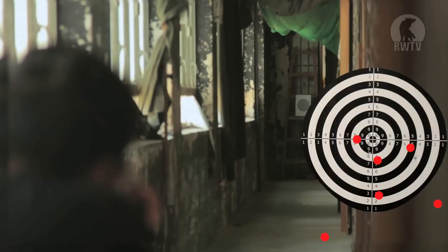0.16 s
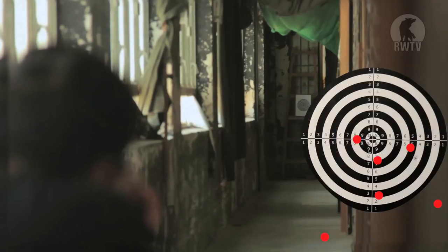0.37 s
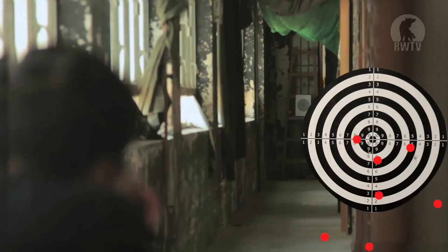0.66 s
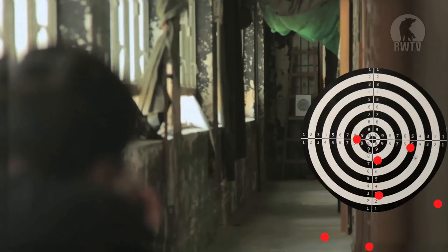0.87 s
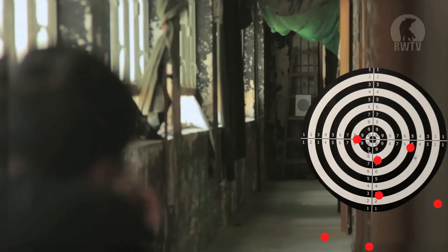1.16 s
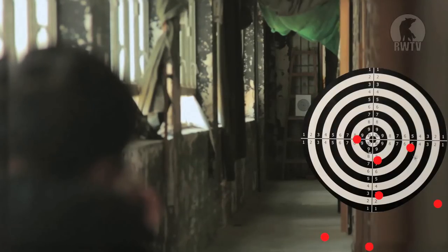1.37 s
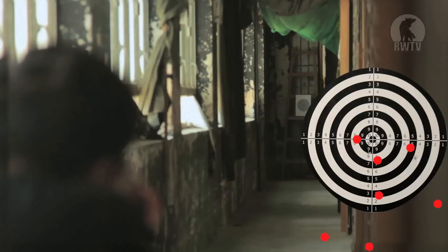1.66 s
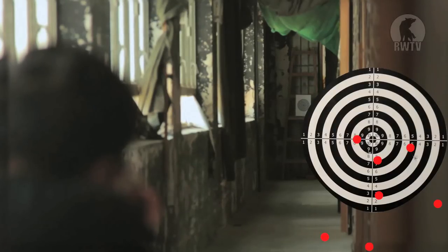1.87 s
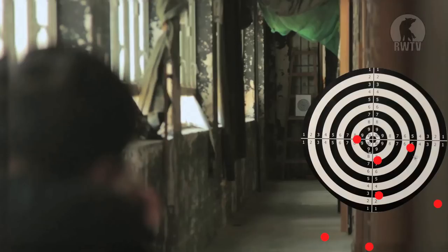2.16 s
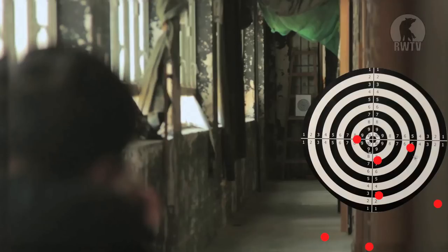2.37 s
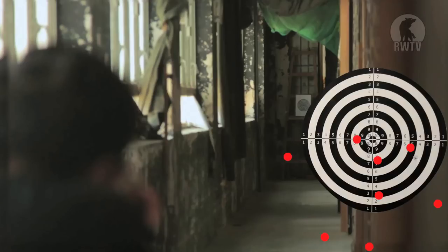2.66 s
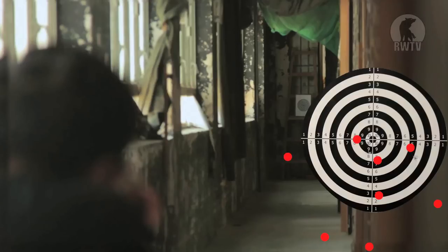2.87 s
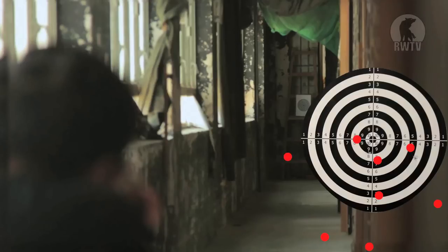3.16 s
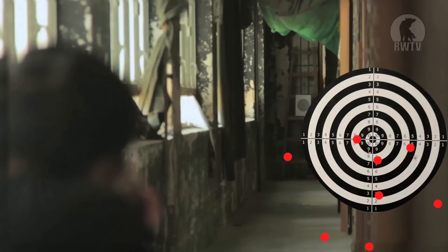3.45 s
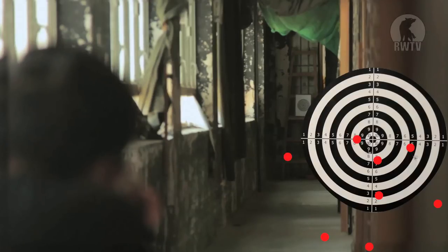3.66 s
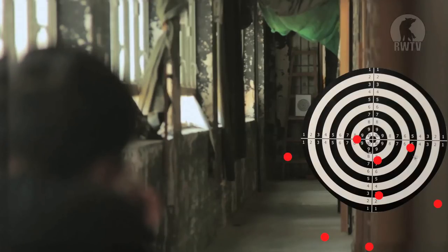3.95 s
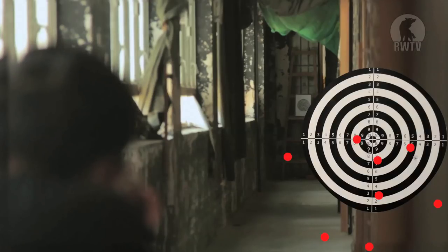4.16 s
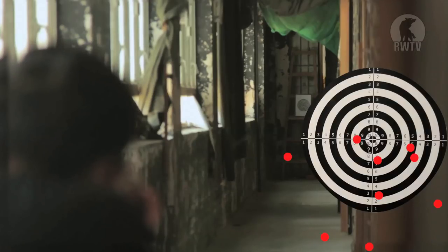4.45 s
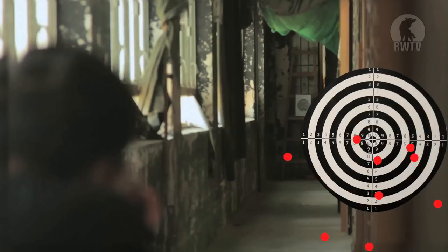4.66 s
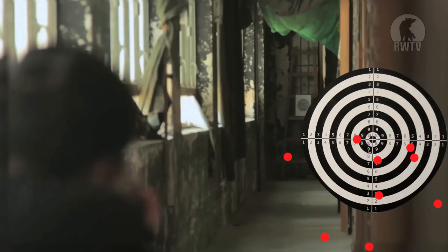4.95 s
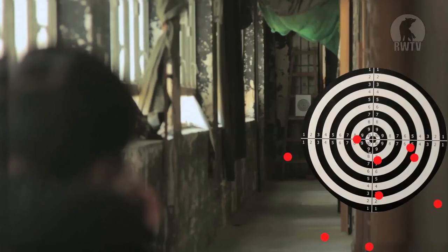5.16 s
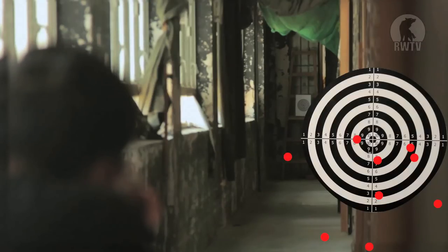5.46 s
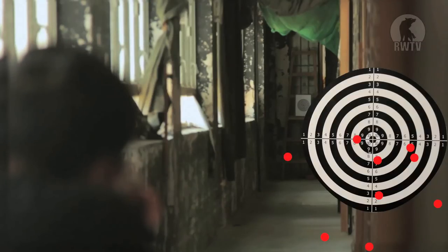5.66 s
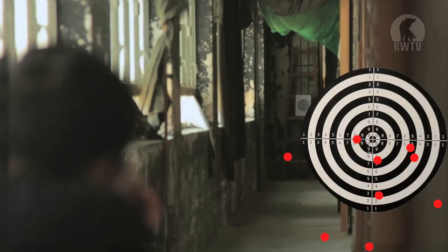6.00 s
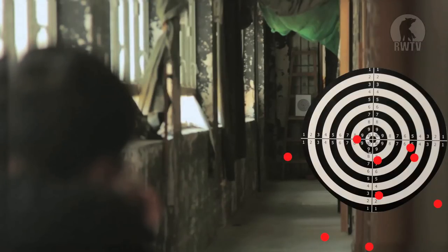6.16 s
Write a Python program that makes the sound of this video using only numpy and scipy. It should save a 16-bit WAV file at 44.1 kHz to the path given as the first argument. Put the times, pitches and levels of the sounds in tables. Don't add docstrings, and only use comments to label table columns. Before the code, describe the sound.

Three sharp mechanical pops from a toy rifle, close and loud enough to distort, ring briefly through a hard-walled hall. A short geared motor buzz wraps each pop, and a second clunk with bouncing metal parts follows at once. After a pause, each pellet ticks against a distant target in reverberation. Tiny stray pellet ticks fall between shots over quiet airy rumble, and a quieter trigger and motor buzz closes the sequence.

```python
import sys
import numpy as np
from scipy import signal
from scipy.fft import rfft, irfft, next_fast_len
from scipy.io import wavfile
from scipy.ndimage import uniform_filter1d, map_coordinates

SR = 44100
rng = np.random.default_rng(int(sys.argv[2]) if len(sys.argv) > 2 else 0)


def master_out(mix):
    frames = np.transpose(np.atleast_2d(mix))
    ceiling = np.clip(frames, -1, 1)
    pcm = np.round(ceiling * 32767).astype(np.int16)
    wavfile.write(sys.argv[1], SR, pcm)


def convert_level_to_amplitude(level_db):
    exponent = np.asarray(level_db, float) / 20
    return 10 ** exponent


N = 279153

# (frequency [Hz], density [dB per Hz])
AIR_SPECTRUM = [(88, -36), (150, -6.5), (217, -4.5), (249, -1), (280, -8.5), (406, -8.5), (524, -12),
                (637, -13), (871, -19.5), (1210, -19.5), (1630, -25), (7320, -33.5), (16000, -38)]
# (frequency [Hz], density [dB per Hz])
DUCT_SPECTRUM = [(15, -53.5), (25, -24), (46, -4), (92, -3), (108, -0.5), (140, -12), (180, -39.5),
                 (310, -120)]
# (time [s], level [dB])
DUCT_LEVEL = [(0.0, -65.5), (0.44, -69.5), (0.63, -63), (1.41, -60), (2.29, -74), (2.63, -63), (3.31, -67),
              (6.33, -67.5)]
# (frequency [Hz], bandwidth [Hz], level [dB])
MAINS_HUM = (101, 23, -71)

# (frequency [Hz], t60 [s])
HALL_DECAY = [(100, 1.1), (260, 0.54), (700, 0.75), (1800, 0.34), (4800, 0.34), (11000, 0.33), (16000, 0.2)]
# (frequency [Hz], t60 [s])
FAR_DECAY = [(100, 1.4), (300, 2.9), (800, 1.8), (2000, .9), (4500, 0.64), (6500, 0.7), (10000, 0.41),
             (16000, 0.16)]
# (frequency [Hz], t60 [s])
BOOTH_DECAY = [(150, 0.054), (400, 0.61), (1000, 0.14), (4000, 0.3), (10000, 0.45), (16000, .09)]
# (frequency [Hz], level [dB])
WALL_COLOUR = [(60, -9), (250, 9.5), (500, -1.5), (1200, -1.5), (4500, -1.5), (7000, -8.5), (15000, -4.5)]
# (frequency [Hz], level [dB])
POP_SPECTRUM = [(60, -14), (200, -1.5), (330, -1), (700, -1.5), (1300, -9.5), (2000, -7), (3000, -7),
                (4500, -5), (5300, -13.5), (8000, -18.5), (15000, -23)]

# (time [s], peak [dB], skitter [dB], backstop thump [dB])
TARGET_HITS = [
    (1.0255, -24.5, -2.5, -45.5),
    (3.0176, -26, -1, -49.5),
    (4.9591, -24, -3, -49),
]
# (centre [Hz], relative width, t60 [s], hall send [dB])
SMACK_SOUND = (2101.5, 1.02, 0.0004, -0.5)
# (delay [s], level [dB], centre [Hz], relative width, t60 [s], hall send [dB])
SKIPS = [
    (.0075, 1, 11000, .3, .045, -1),
    (0.031, -8, 11600, .6, 0.048, -6),
]
# (frequency [Hz], level [dB], time until full [s], rise [s], t60 [s])
PLATE_MODES = [(2300, -9, .0003, .0002, .014), (1650, -15, .0002, .0002, .02),
               (3200, -10, .0002, .0002, .014), (4400, -13, .0001, .0001, .012)]
# (time [s], level [dB], frequency [Hz], t60 [s])
BACKSTOP_HUM = (5.0, -48.5, 202, .6)
# (time [s], peak [dB], centre [Hz], t60 [s])
STRAY_PELLETS = [
    (1.394, -60, 11100, .04),
    (2.051, -67.5, 6000, 0.0234),
    (3.21, -60.5, 11000, .02),
    (3.8695, -55, 2299, .035),
]
# (frequency [Hz], level [dB], relative width, t60 [s])
TRAY_MODES = [(11600, -50, 0.0994, .05), (9010, -59, .15, 0.262), (5220, -57, 0.048, .16),
              (2784, -55, 0.27, 0.145)]

# (time [s], peak [dB], grip thud [dB])
TRIGGER_EVENTS = [
    (0.494, -24.5, -37.5),
    (2.4884, -14.5, -31),
    (4.43, -15, -29),
    (6.3224, -32, -46.5),
]
# (time [s], level [dB])
PISTON_SLAMS = [
    (.5472, 0),
    (2.5421, 0),
    (4.4822, 0),
]
# (time [s], level [dB], stock boom [dB])
BOLT_KNOCKS = [
    (.6613, -6, 0),
    (2.6546, -6, -2.5),
    (4.5878, -7, -5),
]
# (first flight [s], ratio of next flight to it)
BOLT_FLIGHTS = [
    (.0237, .55),
    (.0234, .55),
    (.0215, .78),
]
# (peak [dB], knock [dB])
BOLT_LANDINGS = [
    (-24, -22),
    (-22, -22),
    (-28.5, -28),
]
# (centre [Hz], level [dB], knock [dB])
REBOUND_FACES = [(9190, -0.5, 0), (3200, -7, -29.5)]
# (delay [s], peak [dB], centre [Hz], knock [dB])
THROWN_PARTS = [
    (.015, -12.5, 4256, -27.5),
    (.034, -11.5, 4000, -20),
]
# (time [s], peak [dB], centre [Hz], knock [dB])
LOOSE_PARTS = [
    (.729, -25.5, 4000, -36.5),
    (.729, -28.5, 11000, -65.5),
    (2.667, -36.5, 9910, -31),
    (4.538, -19, 3600, -29),
]
# (frequency [Hz], level [dB], time until full [s], rise [s], t60 [s])
CONTACT_MODES = [(1950, -1, 0.0016, 0.0004, .009), (2870, -3, .0014, .0004, .008),
                 (1085, -6, .0016, 0.00032, .012), (4000, -11.5, 0.00073, 0.00037, 0.0035),
                 (620, -7, .003, 0.00033, .025)]
SLAM_MODES = [(3850, 0, 0, .0008, .0042), (760, 2, .003, .002, .017), (3420, -11, .001, .002, .03),
              (4350, -13, .0004, .0012, .02), (1150, -11, .002, .001, .02), (2360, -14, .001, .001, .02),
              (95, -27, .002, .003, .1), (330, -9, .001, .0012, .015), (466, -27, .003, .002, .35)]
KNOCK_MODES = [(335, -5, .0048, .003, .026), (1900, -10.5, .0008, .001, .02),
               (2650, -12, .0006, .001, .018), (740, -7, .0012, .001, .03), (3150, -15, 0, .001, .02),
               (4380, -18, 0, .001, .015), (1150, -11, .002, .001, .025), (225, -16, .002, .002, .03),
               (466, -21, .004, .003, .2), (960, -21, .003, .002, .12)]
# (frequency [Hz], level [dB], t60 [s])
STOCK_MODES = [(227, -25.5, 0.24), (298.6, -23.5, 0.41), (326, -26, 0.39), (466.5, -21.5, 0.25),
               (559.9, -28.5, 0.074), (720, -24.5, 0.18)]

# (time after trigger [s], gear mesh frequency [Hz], tooth load [dB])
MOTOR_CYCLE = [
    (0, 258.4, -45),
    (.008, 640, -19.5),
    (.017, 1080, -28),
    (.033, 1980, -25),
    (.046, 2268, -23),
    (.056, 2200, -31.5),
    (.09, 1950, -31),
    (.121, 900.2, -21),
    (.145, 360, -30),
]
# (multiple, level [dB])
MESH_HARMONICS = [(1, 0.5), (2, -2.5), (3, -10.5), (4, -11), (5, -16.5)]
# (frequency [Hz], bandwidth [Hz], level [dB])
SHELL_MODES = [(488, 250, -3.5), (980, 320, 3), (1980, 550, 0.5), (3340, 540, 1.5), (4272, 520, 0),
               (8200, 5800, -4)]
# (frequency [Hz], density [dB per Hz])
GRIND_SPECTRUM = [(530, -34), (900, -1.5), (1120, -2.5), (1280, -10), (1930, -1.5), (2250, -6.5),
                  (3610, -3), (6150, -12.5), (7000, -12.5), (9100, -43), (15400, -120)]
# (frequency [Hz], density [dB per Hz])
BRUSH_SPECTRUM = [(3820, -47.5), (6500, -9), (8340, 1), (9990, -4), (10900, -1.5), (16000, -9)]
# (frequency [Hz], density [dB per Hz])
BODY_SPECTRUM = [(59, -48), (100, -17.5), (366, -6.5), (491, 1.5), (756, -5.5), (900, -9), (1170, -38),
                 (1980, -120)]
# (period [s], first load [s], depth [dB])
UNEVEN_WHEEL = (.0188, .015, 3)

POWER_S, SLIP_S, SLAM_S, BRAKE_S, HALT_S, STOP_S = 0.0064, 0.047, .052, .114, .122, .16

LEAD = 200
EARLY = LEAD / SR
T = (np.arange(SR // 3) - LEAD) / SR


def unit(x):
    return x / np.sqrt(np.mean(x ** 2) + 1e-20)


def along(points, hz):
    f, v = np.transpose(points)
    return np.interp(np.log(hz + 1), np.log(f + 1), v)


def ramp(t, start, length):
    return np.clip((t - start) / length, 0, 1)


def filtered(x, response):
    m = next_fast_len(len(x) + 8192)
    return irfft(rfft(x, m) * response(np.fft.rfftfreq(m, 1 / SR)), m)[:len(x)]


def peak(f, hz, width_hz):
    return 1j * f * width_hz / (hz * hz - f * f + 1j * f * width_hz)


def noise(spectrum, size):
    return unit(filtered(rng.standard_normal(size), lambda hz: convert_level_to_amplitude(along(spectrum, hz))))


def add(track, s, sound):
    part = track[round(s * SR):][:len(sound)]
    part += sound[:len(part)]


def swell(full, rise, t60):
    decay = convert_level_to_amplitude(-60 * np.maximum(T - full, 0) / t60)
    return np.where(T < full, np.exp(-((T - full) / rise) ** 2), decay)


def ring(parts, vary_db):
    out = 0
    for hz, db, full, rise, t60 in parts:
        level = convert_level_to_amplitude(db + vary_db * rng.standard_normal())
        out = out + level * swell(full, rise, t60) * np.cos(2 * np.pi * hz * (T - full))
    return out


def crack(hz, wide, rise, t60):
    grains = filtered(rng.standard_normal(len(T)), lambda f: peak(f, hz, wide * hz))
    return unit(grains) * swell(0, rise, t60)


def ventilation():
    t = np.arange(N) / SR
    drift = map_coordinates(rng.standard_normal(60), [np.arange(N) * 6 / SR])
    duct_db = np.interp(t, *np.transpose(DUCT_LEVEL))
    hz, width_hz, hum_db = MAINS_HUM
    hum = unit(filtered(rng.standard_normal(N), lambda f: peak(f, hz, width_hz) ** 2))
    air = convert_level_to_amplitude(-66 + 0.62 * drift) * noise(AIR_SPECTRUM, N)
    rumble = convert_level_to_amplitude(duct_db + 0.37) * noise(DUCT_SPECTRUM, N)
    return air + rumble + convert_level_to_amplitude(hum_db) * hum


def tail(t60s):
    hz, t, z = signal.stft(rng.standard_normal(2 * SR), SR, nperseg=256)
    decay_db = along(WALL_COLOUR, hz)[:, None] - 60 * t / along(t60s, hz)[:, None]
    h = signal.istft(z * convert_level_to_amplitude(decay_db), SR, nperseg=256)[1]
    return h / np.linalg.norm(h)


def hall(x, booth_db, near_db, far_db):
    out = np.zeros(N)
    threshold = 1e-3 * np.abs(x).max()
    for a in range(0, N, SR):
        sent = x[a:a + SR]
        if np.abs(sent).max() <= threshold:
            continue
        answer = convert_level_to_amplitude(booth_db) * tail(BOOTH_DECAY) + convert_level_to_amplitude(near_db) * tail(HALL_DECAY) + convert_level_to_amplitude(far_db) * tail(FAR_DECAY)
        add(out, a / SR + .008, signal.fftconvolve(sent, answer))
    return out


def pellets():
    smacks = [(s, db, *SMACK_SOUND) for s, db, *_ in TARGET_HITS]
    skips = [(s + after, db + skitter_db + less_db, *sound)
             for s, db, skitter_db, _ in TARGET_HITS for after, less_db, *sound in SKIPS]
    strays = [(s, db, hz, .7, t60, 1.5) for s, db, hz, t60 in STRAY_PELLETS]
    tray = [(5.599, db, hz, wide, t60, 1.5) for hz, db, wide, t60 in TRAY_MODES]
    return smacks + skips + strays + tray


def target():
    dry, wet, click = np.zeros(N), np.zeros(N), T == 0
    for s, db, hz, wide, t60, hall_db in pellets():
        add(dry, s - EARLY, convert_level_to_amplitude(db - 8) * crack(hz, wide, rise=0.000091, t60=t60))
        sent = filtered(click, lambda f: peak(f, hz, wide * hz))
        add(wet, s - EARLY - .007, convert_level_to_amplitude(db + hall_db + 21.5) * sent)
    thump_hz, thump_delay_s = 497.4, .006
    for s, db, _, thump_db in TARGET_HITS:
        push = convert_level_to_amplitude(thump_db + 9) * swell(0, 0.0002, 0.01)
        add(dry, s - EARLY - .0004, convert_level_to_amplitude(db) * ring(PLATE_MODES, vary_db=1.5) - push)
        thump = filtered(click, lambda f: peak(f, thump_hz, 1.3 * thump_hz))
        add(wet, s - EARLY + thump_delay_s, convert_level_to_amplitude(thump_db + 43.0) * thump)
    s, db, hz, t60 = BACKSTOP_HUM
    hum = crack(hz, wide=.04, rise=.003, t60=t60) * (1 - ramp(T, .2, .12))
    add(dry, s - EARLY, convert_level_to_amplitude(db) * hum)
    return dry + hall(wet, booth_db=-7.5, near_db=-4.0, far_db=-8)


def pops(piston_db, bolt_db):
    out = np.zeros(N)
    for s, db in PISTON_SLAMS:
        out[round(s * SR)] = convert_level_to_amplitude(db + piston_db)
    for s, db, boom_db in BOLT_KNOCKS:
        out[round(s * SR)] = convert_level_to_amplitude(db + 0.46 * boom_db + bolt_db)
    return filtered(out, lambda hz: convert_level_to_amplitude(along(POP_SPECTRUM, hz)))


def levels(t, last):
    coast = -1500 * np.maximum(t - last, 0)
    slam, brake = ramp(t, SLAM_S - .004, 0.0053), ramp(t, BRAKE_S, .003)
    loose = slam * (1 - ramp(t, SLAM_S, 0.085))
    grind = -26.5 - 14 * (1 - ramp(t, POWER_S - .004, 0.02)) + 10.5 * loose - 8 * ramp(t, BRAKE_S, .03)
    free = ramp(t, SLIP_S, .003) * (1 - slam)
    hiss = -25.5 - 23 * (1 - ramp(t, POWER_S, 0.0078)) - 5 * free - 15 * brake - 40 * t
    shake = -33 - 8 * (1 - ramp(t, 0, .009)) + 7 * slam
    shake = shake - 6 * ramp(t, BRAKE_S - .015, .02) - 6 * ramp(t, BRAKE_S, STOP_S - BRAKE_S)
    return coast, grind + coast, hiss + .6 * coast, shake


def motor():
    out, (s, *cols) = np.zeros(N), np.transpose(MOTOR_CYCLE)
    t = np.arange(SR // 5) / SR
    mesh_hz, load_db = [np.interp(t, s, c) for c in cols]
    coast_db, grind_db, hiss_db, shake_db = levels(t, s[-1])
    period, first, depth_db = UNEVEN_WHEEL
    load = np.cos(2 * np.pi * (t - first) / period)
    whine_db = load_db + coast_db - 7 * ramp(t, HALT_S, .003) - 0.6136 + depth_db * load

    def shell(f):
        return sum((-1) ** k * convert_level_to_amplitude(db) * peak(f, hz, w) ** 2 for k, (hz, w, db) in enumerate(SHELL_MODES))

    def lumps(size=110):
        return unit(uniform_filter1d(rng.standard_normal(len(t)), size=size))

    for start, *_ in TRIGGER_EVENTS:
        turn = 2 * np.pi * np.cumsum(mesh_hz * (1 + .012 * lumps())) / SR
        teeth = 0
        for k, db in MESH_HARMONICS:
            phase = k * turn + .6 * lumps() + 5.0 * rng.random()
            teeth = teeth + convert_level_to_amplitude(db + 1.7 * lumps()) * np.sin(phase)
        whine = filtered(convert_level_to_amplitude(whine_db) * teeth, shell)
        chatter_db = 3.5 * (lumps(size=40) - .5)
        grind = convert_level_to_amplitude(grind_db - 3.5 + 1.0 * load + 2 * lumps() + chatter_db) * noise(GRIND_SPECTRUM, len(t))
        hiss = convert_level_to_amplitude(hiss_db + 0.86 * load + 2 * lumps()) * noise(BRUSH_SPECTRUM, len(t))
        shake = convert_level_to_amplitude(shake_db) * noise(BODY_SPECTRUM, len(t))
        add(out, start, (whine + grind + hiss + shake) * (t < STOP_S))
    return out


def rattles(count=3):
    thrown = [(s + after, db, hz, knock_db)
              for s, _ in PISTON_SLAMS for after, db, hz, knock_db in THROWN_PARTS]
    rebounds = []
    for (s, *_), (flight, shrink), (db, knock_db) in zip(BOLT_KNOCKS, BOLT_FLIGHTS, BOLT_LANDINGS):
        for k in range(count):
            landing = s + flight * (1 - shrink ** (k + 1)) / (1 - shrink)
            loss_db = 8 * k
            for hz, face_db, less_db in REBOUND_FACES:
                rebounds.append((landing, db - loss_db + face_db, hz, knock_db - loss_db + less_db))
    return thrown + rebounds + LOOSE_PARTS


def boom():
    late = round(.018 * SR)
    bands = sum(convert_level_to_amplitude(db) * crack(hz, wide=0.056, rise=0.0061, t60=t60) for hz, db, t60 in STOCK_MODES)
    return np.pad(bands, (late, 0))[:len(T)]


def action():
    out = np.zeros(N)
    for s, db, thud_db in TRIGGER_EVENTS:
        snap = convert_level_to_amplitude(-9.5) * crack(hz=8500, wide=0.37, rise=0.00054, t60=0.01)
        add(out, s - EARLY, convert_level_to_amplitude(db - 2.5) * (ring(CONTACT_MODES, vary_db=2.5) + snap))
        add(out, s - EARLY, convert_level_to_amplitude(thud_db + 2) * crack(hz=260, wide=0.13, rise=0.0022, t60=0.055))
    for s, db in PISTON_SLAMS:
        air_pop = convert_level_to_amplitude(-14.0) * crack(hz=6000, wide=2.0, rise=.001, t60=0.026)
        add(out, s - EARLY, convert_level_to_amplitude(db) * (ring(SLAM_MODES, vary_db=1.0) + air_pop))
    for s, db, boom_db in BOLT_KNOCKS:
        dent = -convert_level_to_amplitude(1) * swell(0, .0002, .002) * np.cos(2 * np.pi * 900 * T)
        grit = convert_level_to_amplitude(-14.5) * crack(hz=9000, wide=1.2, rise=0.00083, t60=0.016)
        grit = grit + convert_level_to_amplitude(-13) * crack(hz=3260, wide=1.1, rise=0.0012, t60=.022)
        knock = ring(KNOCK_MODES, vary_db=1.2) + dent + grit + convert_level_to_amplitude(boom_db) * boom()
        add(out, s - EARLY, convert_level_to_amplitude(db) * knock)
    for s, db, hz, knock_db in rattles():
        tick = convert_level_to_amplitude(db - 8.5) * crack(hz, wide=.4, rise=0.0014, t60=0.011)
        knock = convert_level_to_amplitude(knock_db) * crack(hz=640, wide=0.48, rise=0.0023, t60=0.031)
        add(out, s - EARLY, tick + knock)
    return out


def scene():
    spin = motor()
    sent = convert_level_to_amplitude(-10.5) * spin + pops(piston_db=18.0, bolt_db=17.0)
    answer = hall(sent, booth_db=-9, near_db=-12, far_db=-18.5)
    return (ventilation() + target() + answer + action() + spin)[None]


def low_pass(x):
    return signal.sosfilt(signal.butter(12, 16360, fs=SR, output="sos"), x)


def record(dry):
    heard = filtered(dry[0], lambda hz: 1j * hz / (45 + 1j * hz))
    clipped = heard / (1 + np.abs(heard) ** 12) ** (1 / 12)
    mix = filtered(clipped, lambda hz: np.clip((16200 - hz) / 500, 0, 1))[None]
    return low_pass(mix)


dry = scene()
out = record(dry)
master_out(out)
```